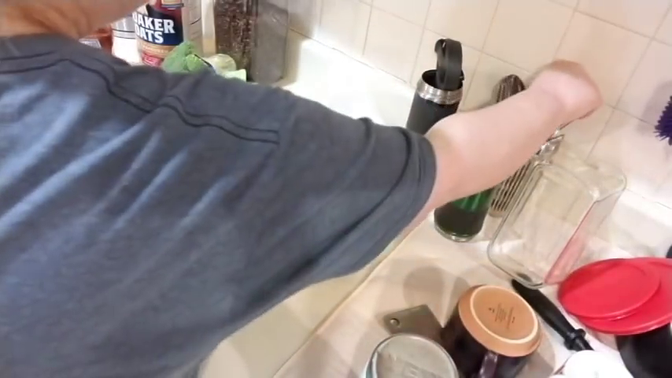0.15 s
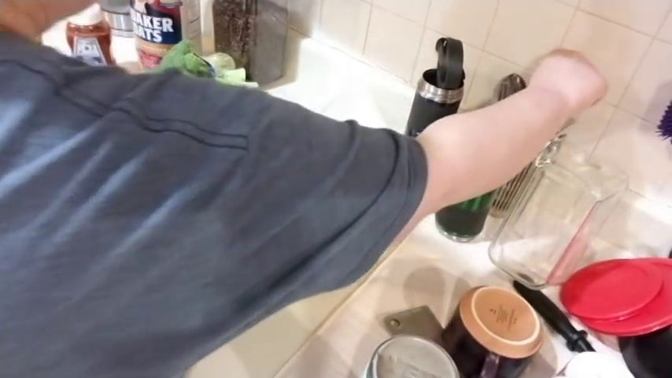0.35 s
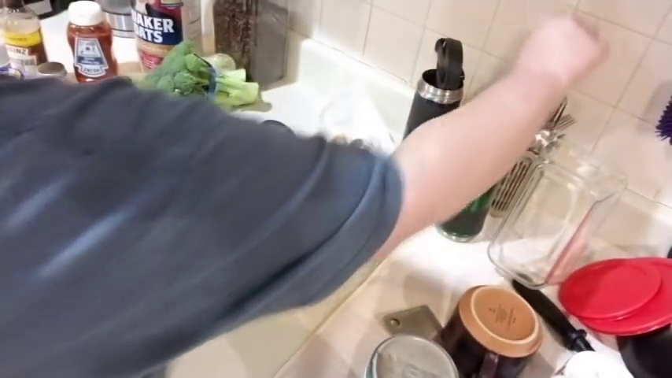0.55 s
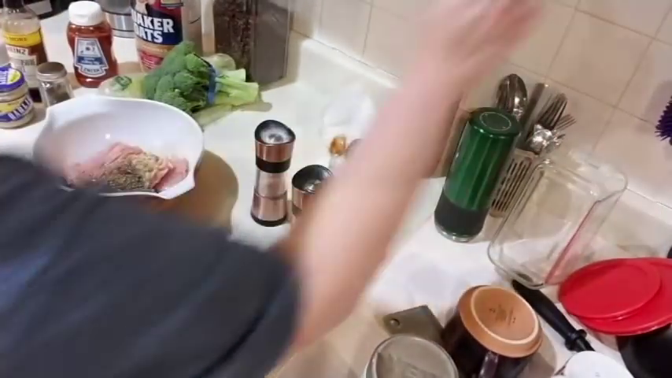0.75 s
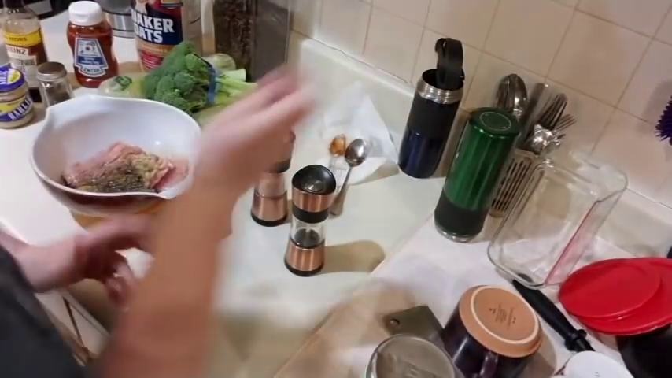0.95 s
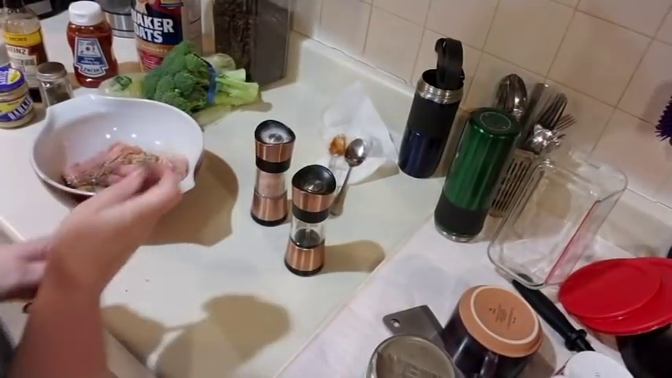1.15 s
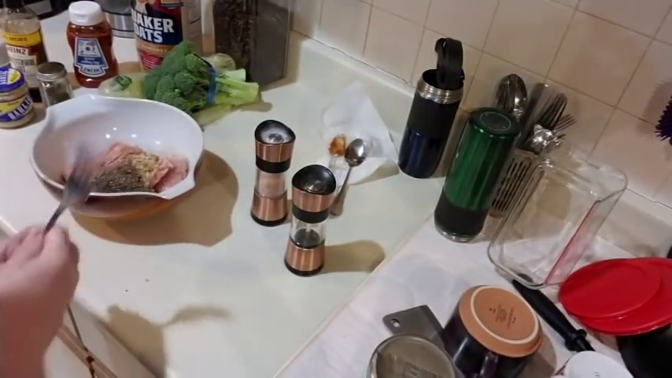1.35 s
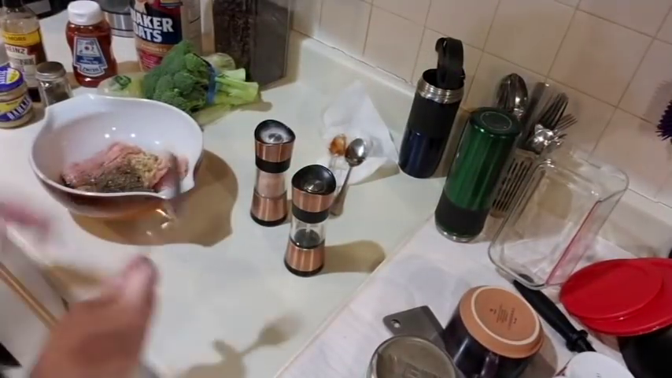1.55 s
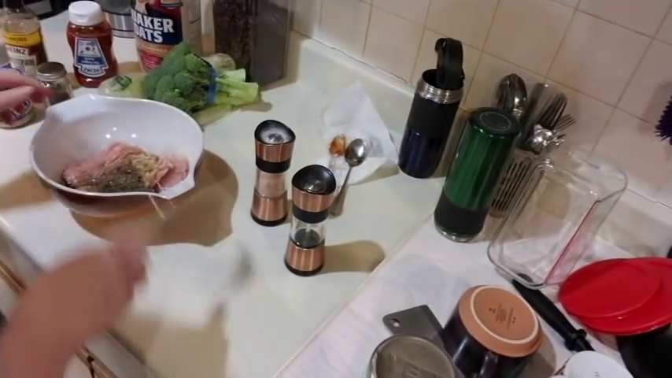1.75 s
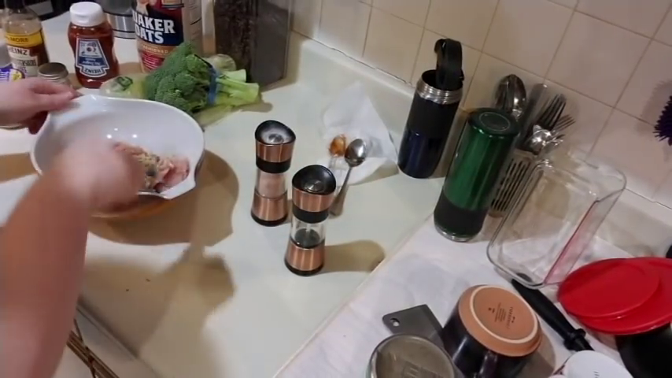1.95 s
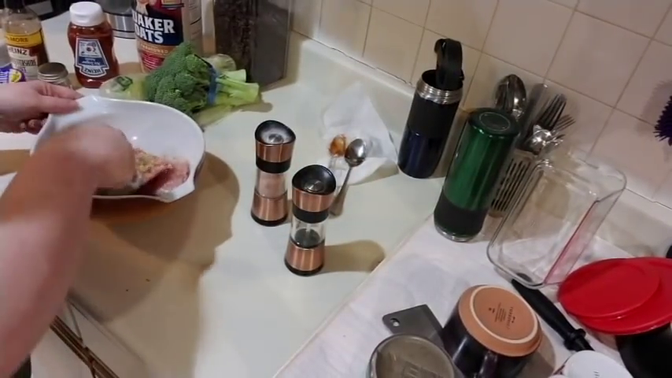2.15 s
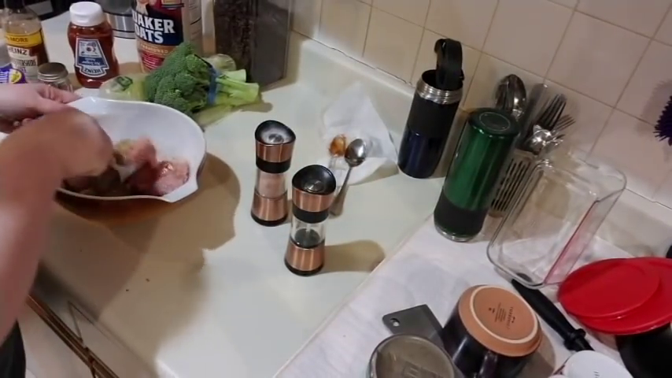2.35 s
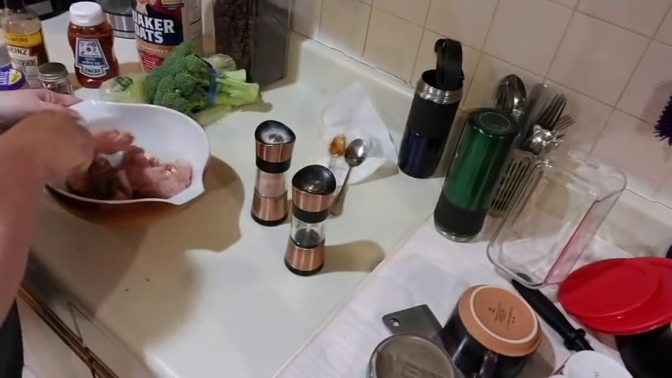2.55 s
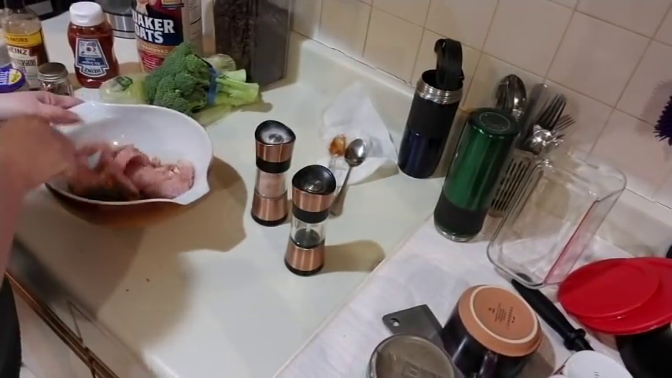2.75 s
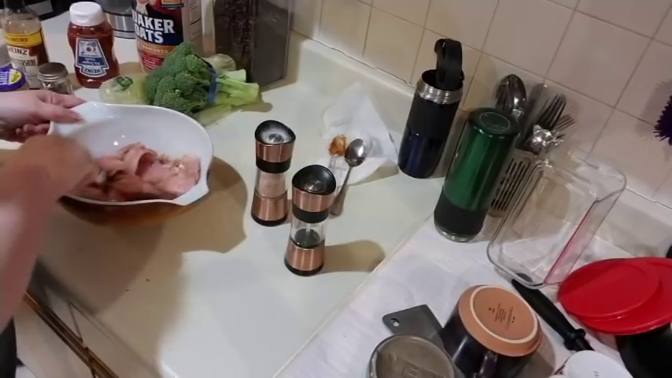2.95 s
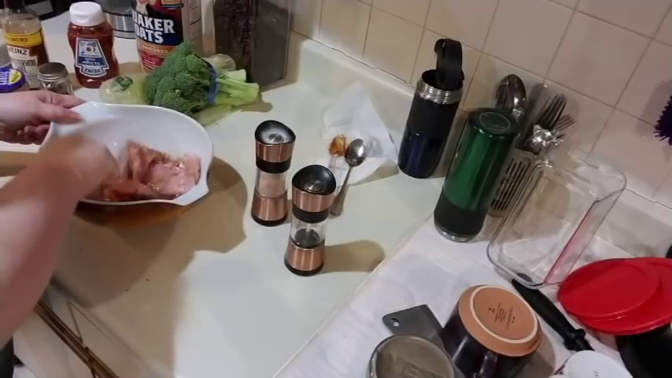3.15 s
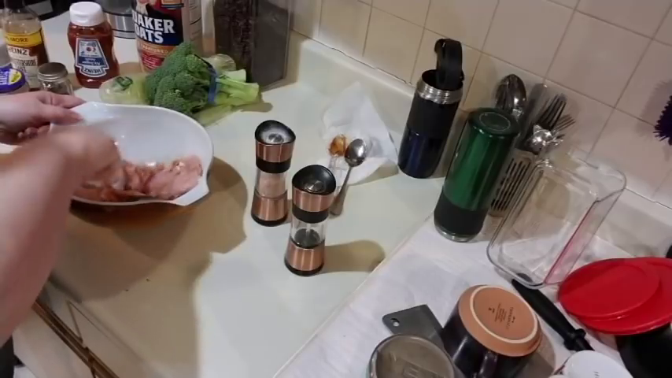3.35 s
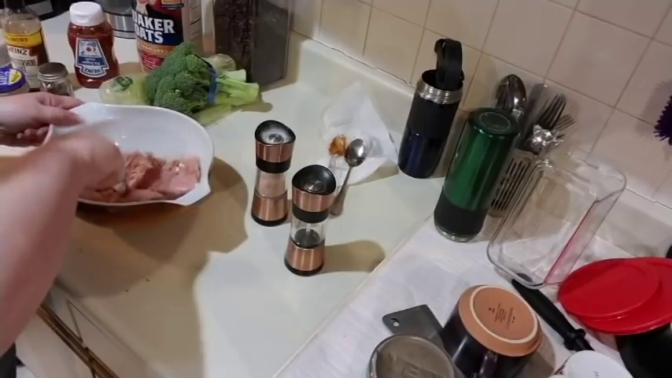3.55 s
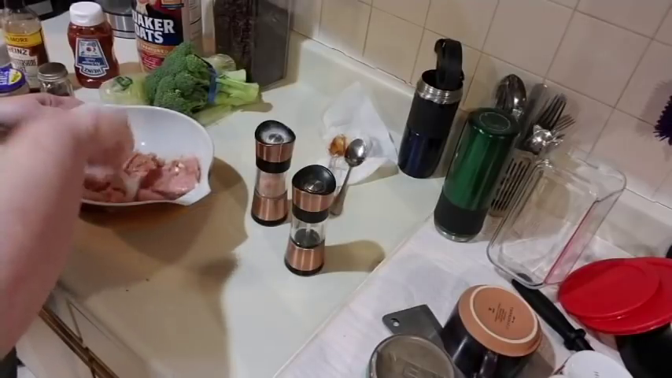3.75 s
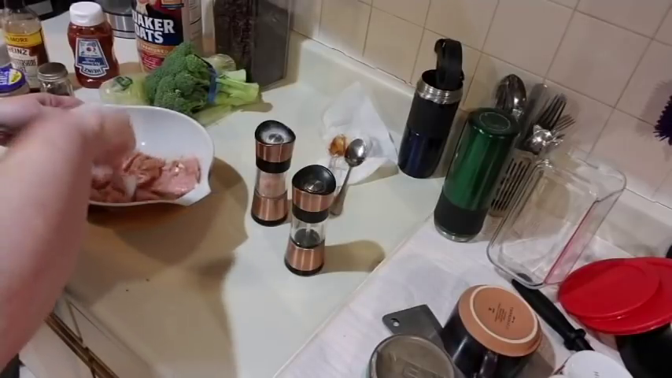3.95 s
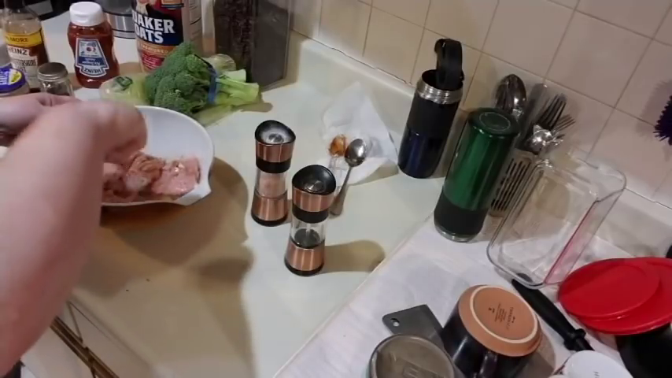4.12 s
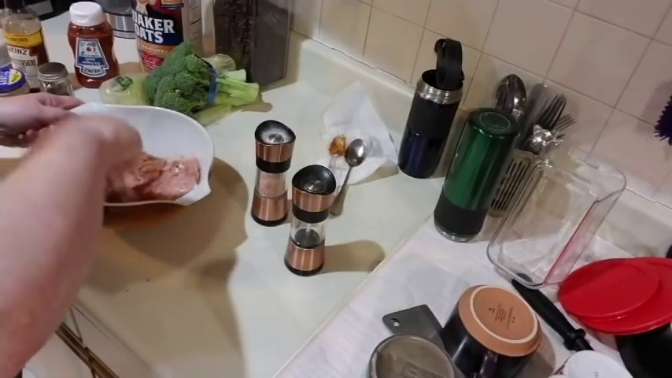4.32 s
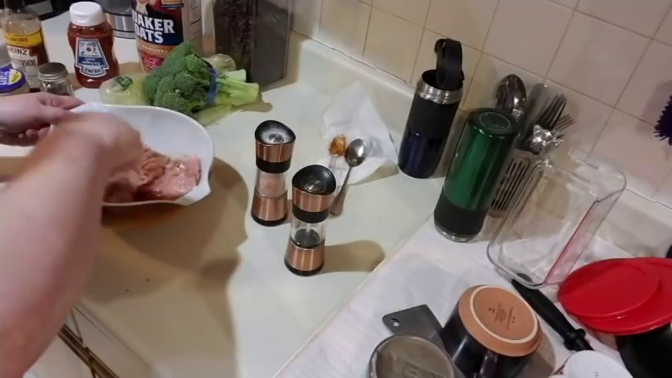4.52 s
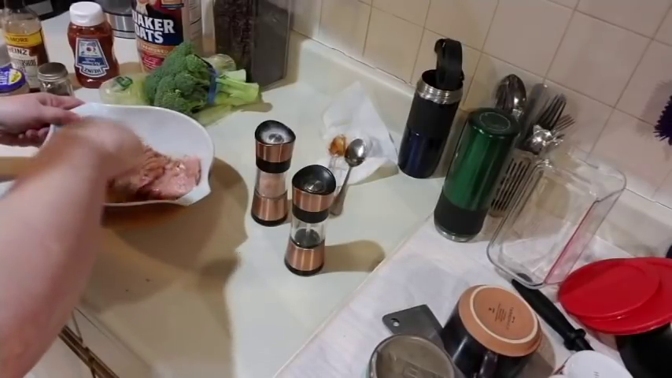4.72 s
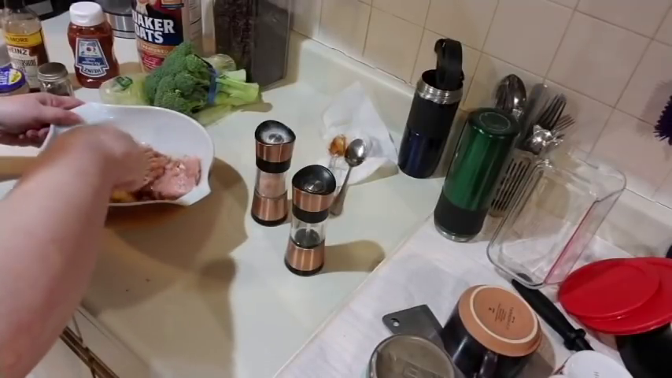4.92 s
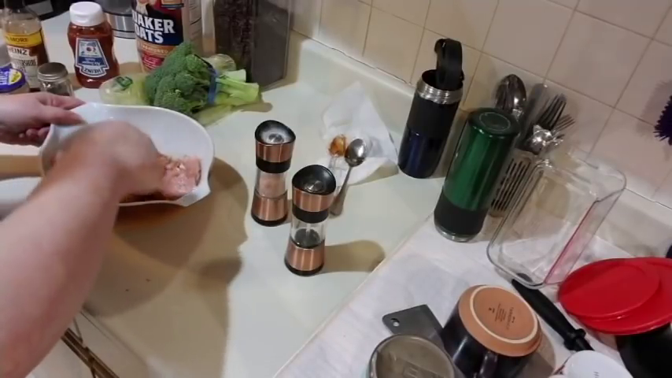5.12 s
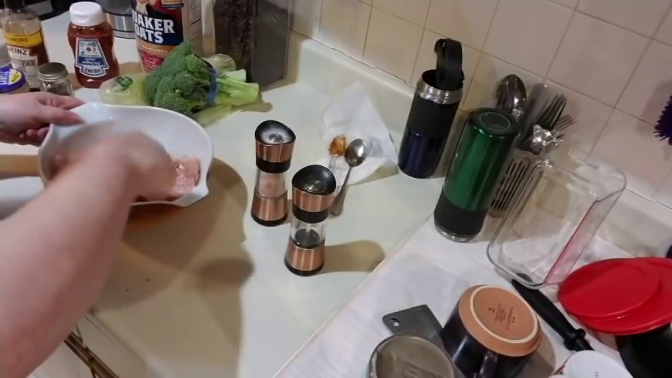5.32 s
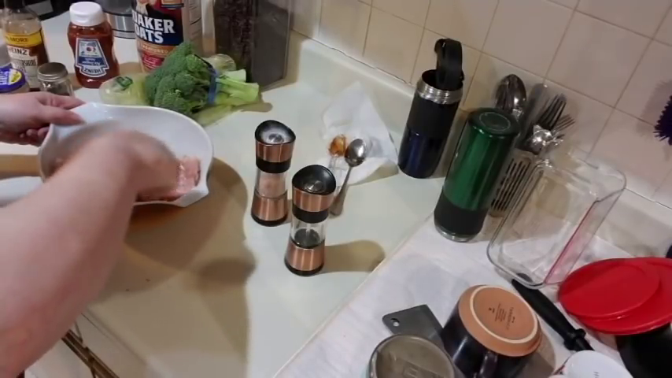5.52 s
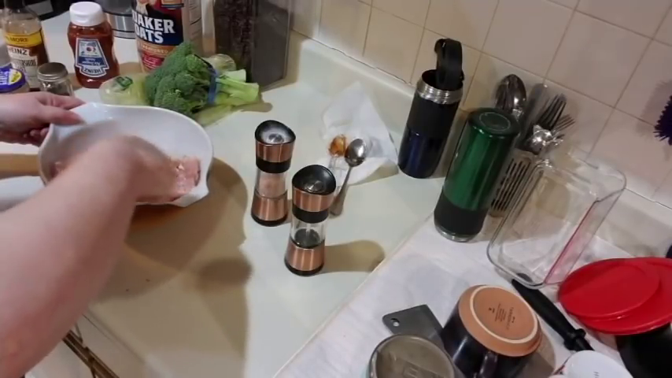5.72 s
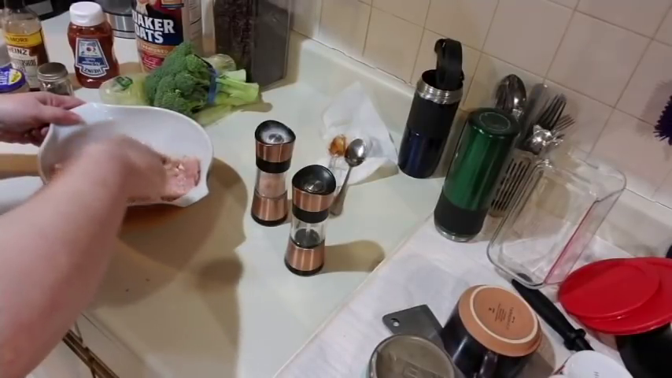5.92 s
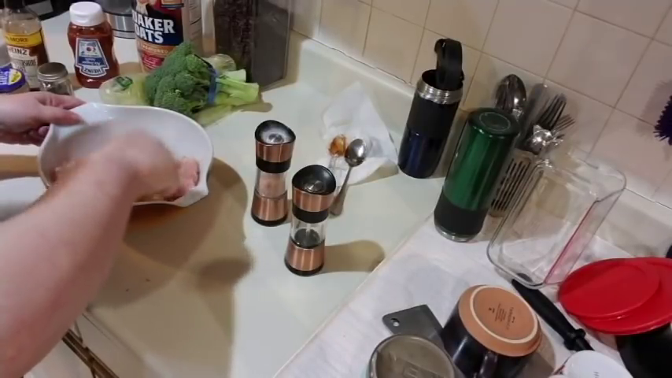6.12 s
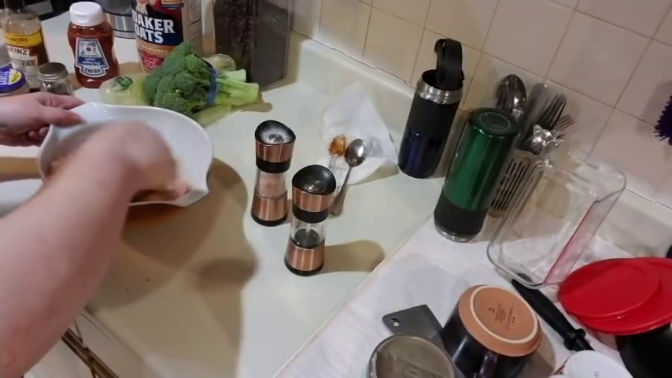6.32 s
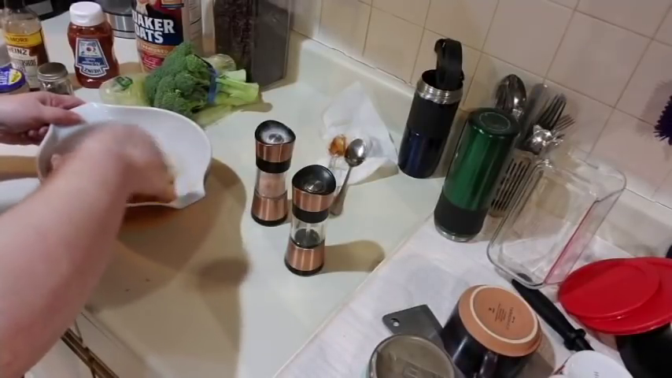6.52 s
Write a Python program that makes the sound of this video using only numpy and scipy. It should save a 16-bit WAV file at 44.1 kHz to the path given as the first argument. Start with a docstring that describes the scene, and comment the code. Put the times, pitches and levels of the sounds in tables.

```python
"""A hand kneads mince in a hard bowl: the bowl rocks and clacks on the counter as noisy contacts excite
its modes, fingers rub it, and air pockets squelch as clusters of pops ringing near a pitch.
At the start cutlery clatters into a steel holder, nearer the left port: contacts strike the steel modes.
Behind lie a small tiled kitchen's decaying echoes, a fridge's hum of unsteady sines and air of banded noise.
Two close microphone ports, bright at the top."""
import sys
import numpy as np
from scipy import signal
from scipy.io import wavfile

SR = 44100
rng = np.random.default_rng(int(sys.argv[2]) if len(sys.argv) > 2 else 0)


def wrap_up_sound(samples):
    """Save the sound to the file named by the first command line argument, as 16-bit audio."""
    columns = np.atleast_2d(samples).T
    # keep every value between -1 and 1, then stretch to whole-number steps
    tamed = np.clip(columns, -1, 1)
    steps = np.round(tamed * 32767).astype(np.int16)
    wavfile.write(sys.argv[1], SR, steps)


N = 294588


def from_db(db):
    """Amplitude factor of a level in dB."""
    return 10 ** (np.asarray(db) / 20)


def rms_one(x):
    """Scale a signal to an rms of 1."""
    return x / np.sqrt(np.mean(x ** 2) + 1e-20)


def butter(x, order, hz, kind):
    """Smooth filter without ripple: "low", "high" or "band"."""
    return signal.sosfilt(signal.butter(order, hz, kind, fs=SR, output="sos"), x)


def in_time(rows):
    """Each column after the seconds, drawn as a line through time."""
    s, *columns = np.transpose(rows)
    return [np.interp(np.arange(N) / SR, s, column) for column in columns]


def at_hz(points, hz):
    """Read a curve of (Hz, value) along a logarithmic frequency axis."""
    curve_hz, values = np.transpose(points)
    return np.interp(np.log(hz), np.log(curve_hz), values)


def drift(rate_hz):
    """Slow chance of spread 1: noise through a double pole at 1/40 of the sample rate."""
    r = np.exp(-80 * np.pi * rate_hz / SR)
    noise = rng.standard_normal(N // 40 + 2002)
    slow = signal.lfilter([1], [1, -2 * r, r * r], noise)[2000:]   # skip the settling
    return np.interp(np.arange(N) / 40, np.arange(len(slow)), rms_one(slow))


def ring(clicks, hz, t60):
    """A damped mode: a unit click sets a tone of height about 1 ringing, with no offset below it."""
    r, w = from_db(-60 / (t60 * SR)), 2 * np.pi * hz / SR
    return signal.lfilter([.5, 0, -.5], [1, -2 * r * np.cos(w), r * r], clicks + 1e-18)


def resonant(x, peaks, uneven_db, channels):
    """Parallel resonances whose shares of an even total wander slowly, differently at each port."""
    out, power = 0, 0
    for k, (hz, width_hz, db) in enumerate(peaks):
        r = np.exp(-np.pi * width_hz / SR)
        mode = rms_one(signal.lfilter([1, 0, -1], [1, -2 * r * np.cos(2 * np.pi * hz / SR), r * r], x))
        share = np.array([from_db(db + uneven_db * drift(3)) for _ in range(channels)])
        out = out + (-1) ** k * mode * share   # alternate signs between neighbours
        power = power + share ** 2
    return out / np.sqrt(power)


def grains(per_s, spread_db):
    """Random clicks of uneven size and sign; rms 1."""
    sizes = from_db(spread_db * np.minimum(rng.exponential(1, N), 5))
    signs = rng.choice([-1, 1], N)
    return rms_one(sizes * signs * (rng.random(N) < per_s / SR))


def two_ports(make, apart):
    """The same chance signal at both ports, with a share of power that only one port gets."""
    shared = make()
    return np.array([np.sqrt(1 - apart) * shared + np.sqrt(apart) * make() for _ in range(2)])


def dying(times, db, t60, rise_s):
    """Envelope: each event swells in rise_s and dies by 60 dB in its own t60."""
    out = np.zeros(N)
    for s, level_db, decay in zip(times, db, np.broadcast_to(t60, len(times))):
        i = round(s * SR)
        t = np.arange(min(N - i, SR // 2)) / SR
        fall = from_db(level_db - 60 * t / max(decay, .005))
        out[i:i + len(t)] += fall * (1 - np.exp(-t / rise_s))
    return out


def bursts(times, db, pitch_hz, t60, pops, cycles, spread, rise_s, climb):
    """Dying clusters of pops, each ringing on three pitches around its own; higher ones tend to come later."""
    out, n = np.zeros(N), SR // 4
    octaves = spread * (np.array([-1, 0, 1]) + .25 * rng.standard_normal((len(times), 3)))
    for s, level_db, hz, decay, offsets in zip(times, db, pitch_hz, np.broadcast_to(t60, len(times)), octaves):
        i = round(s * SR)
        cluster = dying([0], [0], decay, rise_s)[:min(n, N - i)] * pops[i:i + n]
        late = [np.roll(cluster, round(k * climb * decay * SR)) for k in range(3)]
        rung = sum(ring(e, hz * 2 ** d, cycles / hz) for e, d in zip(late, offsets))
        out[i:i + n] += from_db(level_db) * rung / np.max(np.abs(rung))
    return out


def thuds(times, db, pitch_hz):
    """A blow is one short, slightly rough push on the counter, which rings low and a little late."""
    push = 1 + 2.3 * butter(rng.standard_normal(N), 2, 500, "low")
    knocks = bursts(times + 0.0035, db, pitch_hz, 0.018, push, cycles=15.0, spread=0.25, rise_s=0.0011, climb=0.05)
    return butter(knocks, 2, 85, "high")


def favour_db(hz, favoured_hz, octaves=.14):
    """Where the blow lands decides which modes it favours, by up to 11 dB."""
    return 11 * np.exp(-(np.log2(hz / favoured_hz) / octaves) ** 2)


def placed(x, left_lag, left_db):
    """The left port hears the source left_lag samples later and left_db louder than the right."""
    left, right = np.broadcast_to(x, (2, N))
    return np.array([from_db(left_db / 2) * np.roll(left, left_lag), from_db(-left_db / 2) * right])


# Lines of the fridge's hum. Each row: pitch in Hz, level in dB relative to the hum.
HUM_LINES = [(60.4, -0.5), (58, -50), (76, -20.5), (125.7, -23), (193.7, -22), (297.4, -24)]


def fridge(hum_db):
    """Compressor lines, slightly unsteady in level and phase."""
    t = np.arange(N) / SR
    lines = 0
    for hz, db in HUM_LINES:
        level = from_db(db + 0.86 * drift(3.0))
        lines = lines + level * np.sin(2 * np.pi * hz * t + 0.48 * drift(1.5))
    return np.sqrt(2) * from_db(hum_db) * lines


# How alike the two ports hear the air. Each row: frequency in Hz, left-right likeness from -1 to 1.
PORT_LIKENESS = [(60, -0.89), (130, 0.95), (290, 0.76), (640, 0.39), (1410, -0.51), (3100, 0.033),
                 (6820, -0.1), (15000, 0.083)]


def banded(spectrum, patchy_db):
    """Third-octave bands of stereo noise, each with its own level, flicker and likeness; rms 1."""
    out, edges = 0, 25 * 2 ** np.arange(0, 9.4, 1 / 3)
    white = rng.standard_normal((2, 2, N))
    for k, (low, high) in enumerate(zip(edges, edges[1:])):
        mid, side = butter(white[k % 2], 2, [low, high], "band")   # neighbours use separate noise
        hz = np.sqrt(low * high)
        alike = np.clip(at_hz(PORT_LIKENESS, hz), -1, 1)
        gain = from_db(at_hz(spectrum, hz) + patchy_db * drift(4.7))
        out = out + gain * (np.sqrt(1 + alike) * mid + np.sqrt(1 - alike) * side * [[1], [-1]])
    return rms_one(out)


# Colour of the air at the ports. Each row: frequency in Hz, relative density in dB per Hz.
AIR_SPECTRUM = [(25, 14), (60, -47), (95, -12.5), (140, -5.5), (206, -6.5), (300, -8.5), (560, -17.5),
                (700, -51), (1700, -59), (2600, -22.5), (4000, -18), (7500, -18), (13000, -19),
                (16000, -20.5)]


def room_air(hum_db):
    """Patchy noise of the kitchen air, its level set 7.5 dB under the hum level."""
    return from_db(hum_db - 7.5) * banded(AIR_SPECTRUM, patchy_db=.9)


ROOM_T60_S, WALL_CUT_HZ, ROOM_WIDE_HZ, ROOM_DB = 0.3, 13800, 300, -7


def kitchen(x):
    """Dense reflections off the tiles, duller than the direct sound; long waves reach both ports alike."""
    t = np.arange(SR // 2) / SR
    mid, side = rng.standard_normal((2, len(t))) * from_db(-60 * t / ROOM_T60_S) * (t > .003)
    side = butter(side, 1, ROOM_WIDE_HZ, "high")
    echoes = butter(np.array([mid + side, mid - side]), 1, WALL_CUT_HZ, "low")
    echoes /= np.sqrt(np.sum(echoes ** 2, axis=1, keepdims=True))
    return from_db(ROOM_DB) * signal.fftconvolve(x[None], echoes, axes=1)[:, :N]


# Some moments in the clatter bring low thuds of the holder on the counter.
# Each row: start in seconds, thud peak in dB before placing, thud pitch in Hz.
HOLDER_THUDS = [(0.3085, -23.5, 220), (0.3091, -27, 389), (0.3109, -37.5, 690), (0.3244, -28.5, 153),
                (0.392, -40.5, 254)]


def holder_thuds():
    """The holder knocks on the counter, which answers with low thuds."""
    return thuds(*np.transpose(HOLDER_THUDS))


# Cutlery dropping into the holder. Each row: start in seconds, peak of the ringing in dB before placing,
# favoured low mode in Hz, favoured high mode in Hz, how freely it rings from 0 to 1.
CUTLERY_DROPS = [(0.0004, -16, 8800, 14300, 0.61), (0.043, -28, 7666, 13500, 0.5),
                 (0.0858, -13, 9400, 13100, 0.41), (0.0968, -10.5, 6420, 15100, 0.43),
                 (0.1528, -8.5, 4320, 16400, 0.82), (0.176, -22, 7666, 12800, 0.15),
                 (0.191, -25, 9927, 11850, 0.3), (0.263, -21, 9500, 16500, 1),
                 (0.3106, -9, 2700, 16100, 0.46), (0.316, -12.5, 9400, 11500, 0.58),
                 (0.3208, -22, 3850, 15300, 0.24), (0.332, -12, 7370, 12800, 0.7),
                 (0.345, -30, 2720, 15400, 0.8), (0.367, -19, 2720, 13300, 0.54),
                 (0.4055, -16, 7400, 11560, 0.63), (0.416, -37, 5000, 15200, 0.2),
                 (0.4884, -21, 4470, 14000, 0.3), (0.493, -24, 6450, 14600, 0.56),
                 (0.505, -20, 7370, 12500, 0.74), (0.7738, -21, 5200, 13900, 0.33)]
# Modes of the steel. Each row: nominal pitch in Hz, relative level in dB, undamped ring time (t60) in seconds.
STEEL_MODES = [(2719, -20, .2), (3850, -20, .15), (4317, -21, .15), (4770, -19, .1), (5150, -17, .12),
               (6450, -18, .15), (7370, -13, .25), (7666, -16, .13), (8340, -20, .12), (9400, -16, .15),
               (9927, -20, .3), (11230, -8, .1), (11650, -10, .15), (11850, -10, .2), (11964, -10, .15),
               (12620, -10, .2), (12790, -5, .2), (13170, -8, .2), (13545, -12, .2), (13990, -12, .2),
               (14140, -12, .2), (14390, -10, .2), (14550, -7, .15), (14900, -8, .15), (15140, -1, .15),
               (15345, -2, .25), (15540, -4, .15)]


def cutlery():
    """Each drop, a hard contact and short rattle, strikes every steel mode anew; hiss scrapes along."""
    s, peak_db, low_hz, high_hz, free = np.transpose(CUTLERY_DROPS)
    free, n = np.clip(free, .1, 1), SR // 3
    out, contacts = np.zeros((2, N)), two_ports(lambda: grains(1500, 3), apart=.55)
    contacts[:, np.round((s + .0006) * SR).astype(int)] = 16   # the hard first contact
    chance = rng.standard_normal((len(s), len(STEEL_MODES), 2))
    for at, level_db, low, high, share, draws in zip(s, peak_db, low_hz, high_hz, free, chance):
        i = round(at * SR)
        rattle = (dying([at], [0], .13 * share, .0005) * contacts)[:, i:i + n]
        rung = 0
        for (hz, db, t60), (strength, detune) in zip(STEEL_MODES, draws):
            favoured_db = favour_db(hz, low) + favour_db(hz, high, octaves=.05)
            gain = from_db(db + favoured_db + 3 * strength)
            piece_hz = hz * (1 + .008 * detune)   # other pieces, slightly other pitches
            rung = rung + gain * ring(rattle, piece_hz, .6 * t60 * share)
        out[:, i:i + n] += from_db(level_db) * rung / np.max(np.abs(rung))
    hiss = butter(two_ports(lambda: grains(8300, 2.3), apart=0.74), 2, 3000, "high")
    out += dying(s, peak_db - 20, 0.27 * free, 0.00014) * rms_one(hiss)
    return out + holder_thuds()


# Air pockets bursting in the mince.
# Each row: start in seconds, peak in dB before placing, pitch in Hz, decay (t60) of the pops in seconds.
AIR_POCKETS = [(1.478, -48, 570, 0.065), (1.56, -51.5, 650, 0.08), (1.845, -44.5, 430, 0.07),
               (2.741, -45, 670, 0.035), (3.256, -47.5, 616, 0.055), (3.45, -40, 1480, 0.032),
               (3.543, -28, 2680, 0.021), (3.814, -50.5, 534, 0.062), (3.972, -39.5, 620, 0.032),
               (3.997, -33, 556, 0.038), (4.193, -41.5, 640, 0.079), (4.218, -37, 806, 0.05),
               (4.601, -41.5, 473, 0.16), (4.641, -42, 1250, 0.038), (4.809, -42, 1180, 0.035),
               (4.95, -40, 1040, 0.056), (4.98, -41.5, 696, 0.053), (5.303, -44.5, 1500, 0.038),
               (5.338, -36, 1510, 0.12), (5.357, -28.5, 2250, 0.11), (5.387, -26.5, 1550, 0.06),
               (5.398, -30, 2800, 0.04), (5.479, -34.5, 1560, 0.08), (5.49, -33, 2280, 0.07),
               (5.518, -34.5, 1550, 0.027), (5.542, -28.5, 1510, 0.052), (5.577, -22, 2410, 0.02),
               (5.579, -30.5, 975, 0.04), (5.739, -40, 1400, 0.12), (5.754, -29, 2500, 0.05),
               (5.776, -36.5, 2350, 0.03), (5.817, -40, 2310, 0.03), (5.792, -42, 593, 0.056),
               (5.894, -29.5, 2130, 0.0544), (5.906, -28.5, 553, 0.027), (5.941, -44, 505, 0.039),
               (6.061, -51.5, 1220, 0.049), (6.22, -23, 700, 0.052), (6.258, -39.5, 820, 0.05),
               (6.29, -37, 900, 0.035), (6.434, -46, 980, 0.036), (6.473, -36.5, 620, 0.04),
               (6.495, -37, 597, 0.074), (6.535, -35.5, 770, 0.04), (6.57, -37.5, 1840, 0.051),
               (6.624, -33.5, 780, 0.052), (6.634, -34, 1850, 0.03), (6.648, -32.5, 1610, 0.05)]


def squelches():
    """A pocket opens with a pop, then its bubbles burst around its pitch, higher as the pocket shrinks."""
    s, db, hz, decay = np.transpose(AIR_POCKETS)
    pops = grains(700, 3)
    pops[np.round((s + .001) * SR).astype(int)] = 20   # the opening pop
    return bursts(s, db, hz, decay, pops, cycles=19.5, spread=0.12, rise_s=0.00012, climb=0.13)


# The hand presses into the mince. Each row: time of full pressure in seconds, build-up in seconds,
# hold in seconds, rub in the bowl in dB, wet fizz in dB (both before placing).
HAND_PRESSES = [(1.481, 0.053, 0.025, -54, -62), (1.843, 0.11, 0.085, -61, -89),
                (2.164, 0.27, 0.0044, -53.5, -64), (2.449, 0.34, 0.083, -52, -66),
                (2.746, 0.12, 0.011, -52, -52), (3.261, 0.058, .005, -61, -73),
                (3.452, 0.046, 0.013, -61, -65), (3.543, 0.037, .01, -55.5, -65),
                (3.993, 0.16, 0.025, -56, -75), (4.205, 0.11, 0.049, -53.5, -53.5),
                (4.392, 0.04, 0.014, -52, -61), (4.602, 0.018, 0.029, -47, -53),
                (4.828, .02, 0.018, -51.5, -57), (4.943, .01, 0.014, -51.5, -63),
                (5.361, 0.15, .005, -52, -54), (5.57, 0.016, 0.0037, -53, -62),
                (5.732, 0.12, 0.0088, -52.5, -42), (5.896, 0.083, 0.0045, -45.5, -46.5),
                (6.212, 0.075, 0.012, -47.5, -62), (6.49, 0.5, 0.0035, -50, -51.5),
                (6.619, 0.012, 0.0076, -53, -39.5)]


def pressure(db, fade_db_per_s):
    """Envelope of all presses: each builds up by 53 dB over its build-up, holds and lets go."""
    t = np.arange(N) / SR
    out = np.zeros(N)
    for (s, build, hold, *_), level_db in zip(HAND_PRESSES, db):
        near = slice(max(round((s - 3 * build) * SR), 0), round((s + hold + .5) * SR))
        early, late = np.maximum(s - t[near], 0), np.maximum(t[near] - s - hold, 0)
        out[near] += from_db(level_db - 53 * early / max(build, .002) - fade_db_per_s * late)
    return out


# The mince keeps seething between presses.
# Each row: time in seconds, sticky crackle in dB, wet fizz in dB (both before placing).
MINCE_SEETHE = [(1.0, -63, -76), (1.45, -57, -74.5), (2.0, -59.5, -70.5), (2.4, -53, -68.5),
                (2.75, -57, -69), (2.95, -60.5, -72), (3.4, -50, -74), (3.7, -60.5, -67.5),
                (4.2, -46.5, -64.5), (4.6, -63, -69), (5.1, -51, -64.5), (5.5, -51.5, -55), (6.0, -58, -72),
                (6.3, -60, -57), (6.68, -51, -75)]
# The bowl's air and wall under the rubbing. Each row: pitch in Hz, width in Hz, relative level in dB.
BOWL_HOLLOW = [(400, 90, -1), (567, 70, -2), (700, 110, -3), (850, 110, -2), (1000, 90, 0), (1130, 90, 0)]


def kneading():
    """Fingers rub the bowl through the mince, moisture fizzes, sticky threads tear in tiny ticks."""
    *_, rub_db, fizz_db = np.transpose(HAND_PRESSES)
    crackle_db, seethe_db = in_time(MINCE_SEETHE)
    rub = resonant(grains(900, 1.7), BOWL_HOLLOW, uneven_db=4.0, channels=2)
    clumps = from_db(5.0 * drift(11))   # fizz and ticks crowd and thin out together
    fizz = butter(grains(700 * clumps, 3.5), 2, [1200, 3000], "band")
    ticks = butter(grains(6000 * clumps, 5.1), 1, 3000, "high")
    rubbing = pressure(rub_db, fade_db_per_s=293) * rub
    wet = pressure(fizz_db, fade_db_per_s=232) + from_db(seethe_db)
    return rubbing + wet * rms_one(fizz) + from_db(crackle_db) * rms_one(ticks)


# The bowl clacking on the counter. Each row: start in seconds, rim level in dB, body level in dB,
# favoured body mode in Hz, thud peak in dB, thud pitch in Hz, decay (t60) of the rim in seconds;
# the levels hold before placing.
BOWL_CLACKS = [(1.4792, -54, -42.5, 3700, -40.5, 186, 0.19), (1.8475, -45, -48, 4420, -35, 166, 0.036),
               (2.367, -41, -44, 7090, -43, 290, 0.03), (2.7392, -32, -31.5, 6530, -63, 144, 0.032),
               (3.001, -35, -43, 4280, -77, 132, 0.023), (3.1657, -47, -48, 5930, -73, 186, 0.068),
               (3.252, -26.5, -31, 5200, -33.5, 297, 0.066), (3.4542, -29.5, -28, 3560, -63, 133, 0.042),
               (3.5418, -16, -29, 5000, -31.5, 305, 0.028), (3.8128, -22.5, -40, 5130, -39.5, 276, 0.03),
               (3.9953, -12.5, -28.5, 4600, -29, 290, 0.036), (4.193, -22.5, -31, 3660, -28.5, 302, 0.08),
               (4.3897, -27.5, -36.5, 2910, -36.5, 271, 0.092),
               (4.6001, -14.5, -23, 5340, -28.5, 232, 0.073), (4.6371, -59, -31, 2570, -56, 308, 0.086),
               (4.811, -15, -25.5, 8330, -30, 231, 0.073), (4.9451, -25, -30, 5130, -42, 250, 0.075),
               (5.335, -39, -36.5, 3850, -38, 148, 0.2), (5.361, -18, -24.5, 6400, -37, 220, 0.06),
               (5.5186, -36, -29.5, 2750, -47, 138, 0.056), (5.542, -12.5, -20.5, 6430, -36, 208, 0.028),
               (5.6945, -36, -35, 2050, -36.5, 159, 0.038), (5.716, -10, -18.5, 6700, -42, 166, 0.032),
               (5.871, -48, -43, 6000, -70, 200, 0.084), (5.888, -18.5, -24.5, 6450, -37.5, 207, 0.049),
               (6.184, -28.5, -31.5, 2910, -60, 155, 0.12), (6.3525, -45.5, -44.5, 3970, -73, 148, 0.18),
               (6.571, -45, -32, 7000, -47, 153, 0.025), (6.618, -14.5, -24.5, 6400, -40.5, 203, 0.035)]
# Modes of the bowl's body. Each row: pitch in Hz, width in Hz, relative level in dB.
BODY_MODES = [(2300, 300, -2), (2770, 280, -2), (3290, 300, -2), (3840, 260, -2), (5100, 400, 2),
              (5500, 350, -3), (6025, 240, -1), (6550, 400, -6), (7100, 350, -3), (7450, 300, -2),
              (7870, 350, -3), (9100, 800, -5)]
# Modes of the bowl's rim. Each row: pitch in Hz, width in Hz, relative level in dB.
RIM_MODES = [(11450, 700, -3), (12300, 700, 0), (13000, 700, 0), (14100, 700, -3), (14900, 900, -6)]
BOWL_RING_DB, BOWL_RING_T60_S = -15.5, 0.043


def bowl():
    """The foot strikes and chatters briefly: rim and body crack and ring, the counter knocks below."""
    s, rim_db, body_db, body_hz, thud_db, thud_hz, decay = np.transpose(BOWL_CLACKS)
    contact = two_ports(lambda: grains(4000, 3), apart=.45)
    latest = np.maximum(np.searchsorted(s, np.arange(N) / SR) - 1, 0)
    held_hz = body_hz[latest]   # each clack's favoured pitch holds until the next
    body = [(hz, width_hz, db + favour_db(hz, held_hz)) for hz, width_hz, db in BODY_MODES]
    rim = dying(s, rim_db, decay, 0.0016) * resonant(contact, RIM_MODES, uneven_db=6.0, channels=2)
    out = placed(rim, left_lag=2, left_db=-3)   # the rim stands a little to the right of the foot
    out += dying(s, body_db, 1.3 * decay, .0005) * resonant(contact, body, uneven_db=3, channels=2)
    strengths = rng.standard_normal((len(s), len(BODY_MODES)))
    for (hz, _, db), strength in zip(BODY_MODES, strengths.T):   # the first contact sets the bowl ringing
        strikes = np.zeros(N)
        strike_db = body_db + db + BOWL_RING_DB + .5 * favour_db(hz, body_hz) + 3 * strength
        strikes[np.round((s + .0008) * SR).astype(int)] = from_db(strike_db)
        out += ring(strikes, hz, BOWL_RING_T60_S)
    return out + thuds(s, thud_db, thud_hz)


# Background level, which sinks and recovers; the air follows it.
# Each row: time in seconds, hum level in dB.
BACKGROUND_LEVEL = [(0.0, -40.5), (0.09, -41.5), (0.28, -42.5), (0.37, -47), (1.34, -48.5), (1.9, -43),
                    (5.3, -42.5), (5.38, -42.5), (6.68, -41.5)]


def scene():
    """Bowl, mince and cutlery close to the ports and in the room, over fridge and air."""
    hum_db, = in_time(BACKGROUND_LEVEL)
    steel, mince = cutlery(), bowl() + squelches() + kneading()
    # the cutlery reaches the left port first and louder; the bowl reaches it later, yet louder
    near = placed(steel, left_lag=-10, left_db=4.5) + placed(mince, left_lag=5, left_db=2.5)
    hum = fridge(hum_db) * from_db([[.5], [-.5]])   # 1 dB louder on the left
    return near + kitchen(steel[0] + mince[0]) + room_air(hum_db) + hum


# Treble dip of the microphone ports. In order: centre in Hz, width in Hz, depth in dB.
TREBLE_DIP = (9700, 2400, -4.5)


def record(dry):
    """The ports have a dip in the treble and fall off steeply above 15750 Hz; the top is cut by 17000 Hz."""
    hz, width_hz, db = TREBLE_DIP
    dip = signal.lfilter(*signal.iirpeak(hz, hz / width_hz, fs=SR), dry)
    dry = dry - (1 - from_db(db)) * dip
    ports = signal.sosfilt(signal.ellip(8, .5, 35, 15750, fs=SR, output="sos"), dry)
    return signal.sosfilt(signal.cheby2(12, 50, 17000, fs=SR, output="sos"), ports)


dry = scene()
out = record(dry)
wrap_up_sound(out)
```